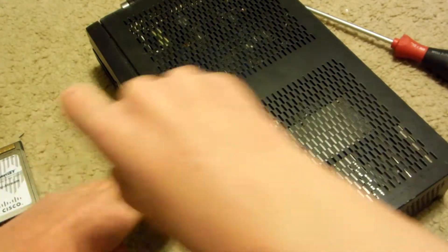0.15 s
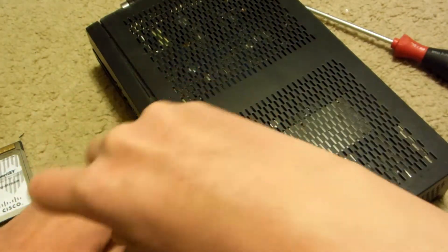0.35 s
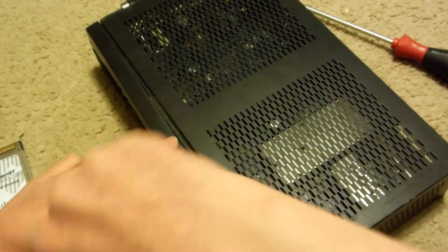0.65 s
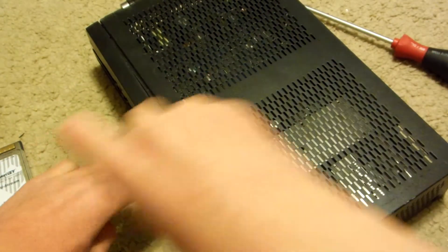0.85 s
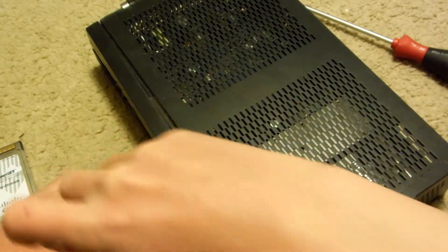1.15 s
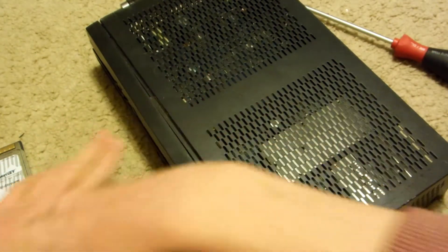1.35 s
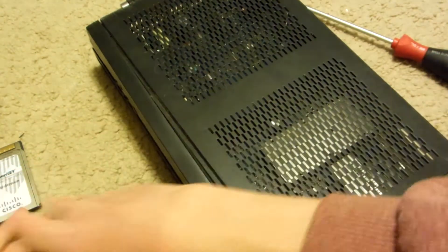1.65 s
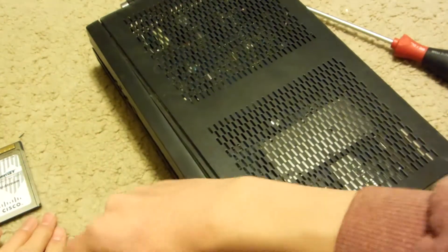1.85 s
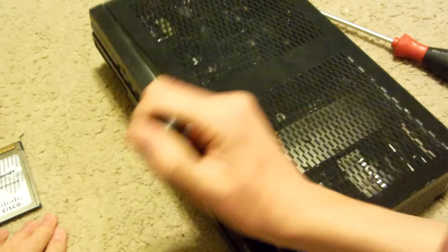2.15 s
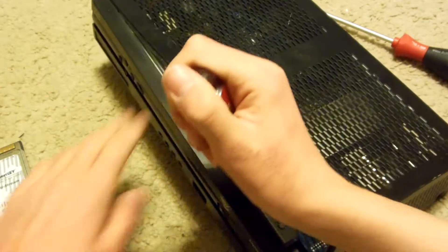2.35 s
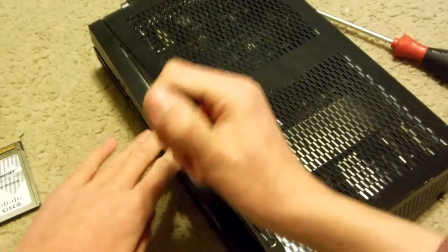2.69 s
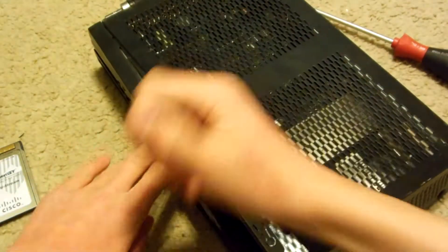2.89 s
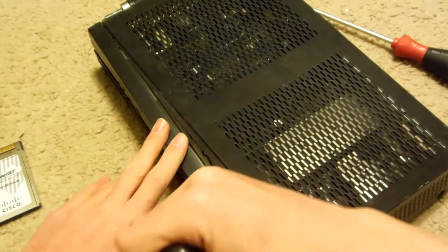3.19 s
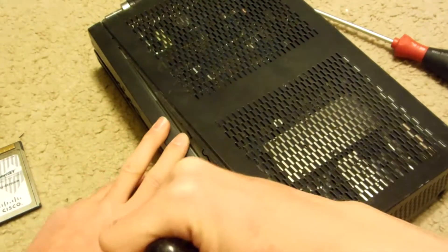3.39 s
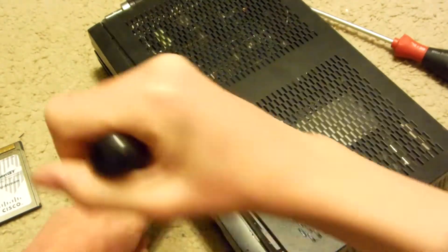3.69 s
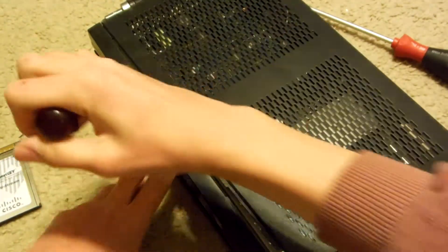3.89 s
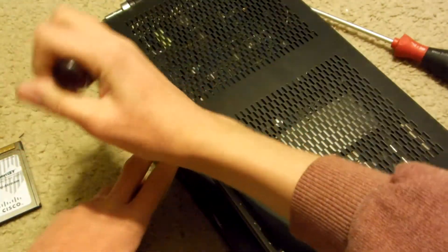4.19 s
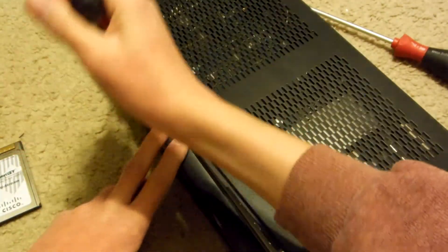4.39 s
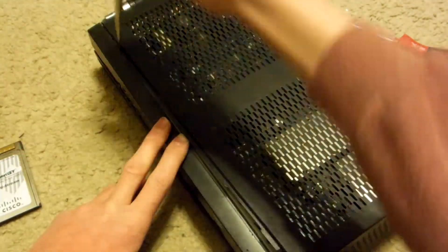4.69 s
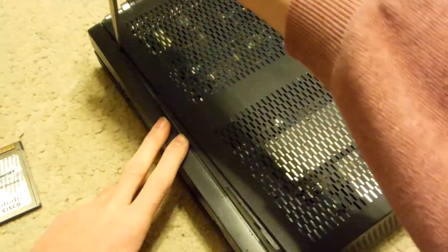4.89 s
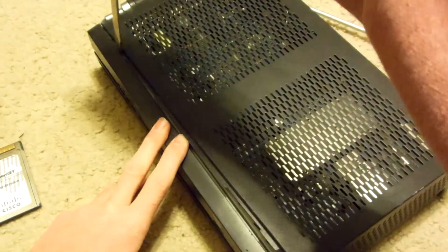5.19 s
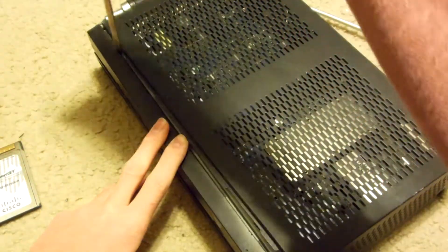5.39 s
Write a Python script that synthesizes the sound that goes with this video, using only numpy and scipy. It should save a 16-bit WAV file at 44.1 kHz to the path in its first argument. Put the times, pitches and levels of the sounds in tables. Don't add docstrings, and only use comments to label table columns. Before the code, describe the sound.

Indoors and close up, a blade knocks and drags on a sheet-metal casing, with tinny clatter, brief groans and a hard closing knock.

```python
import sys
import numpy as np
from scipy import signal
from scipy.fft import rfft, irfft, next_fast_len
from scipy.io import wavfile
from scipy.ndimage import uniform_filter1d

SR = 44100
rng = np.random.default_rng(int(sys.argv[2]) if len(sys.argv) > 2 else 0)


def to_wav(sig):
    pcm = np.clip(np.atleast_2d(sig), -1, 1) * 32767
    pcm = np.round(pcm).astype(np.int16)
    wavfile.write(sys.argv[1], SR, pcm.T)


def voltage_ratio(decibels):
    exponent = np.asarray(decibels, float) / 20
    return 10 ** exponent


N = 244358

# (frequency [Hz], density [dB/Hz])
FLOOR_SPECTRUM = [(12, -40.5), (20, -6.5), (70, -11), (87, -15.5), (224, -19.5), (265, -25), (304, -21),
                  (576, -28.5), (1570, -40.5), (1850, -35), (3310, -40.5), (13300, -48), (15300, -59.5)]
FLOOR_LEVEL_DB = -57
# (frequency [Hz], side minus mid [dB])
FLOOR_WIDTH = [(60, -12), (110, -3.5), (200, -3.5), (380, -8), (690, -3), (1280, 1.5), (2360, -3.5),
               (4360, 0.5), (8040, -1), (14800, 3.5)]
# (frequency [Hz], level [dB])
WHINE = [(13194, -83.5)]
# (time [s], level [dB])
WHIR = [(0.0, -62), (0.272, -64), (0.31, -73.5), (0.6, -65), (0.78, -90), (1.012, -76), (1.272, -60),
        (1.459, -83)]
WHIR_HZ, WHIR_TOP_DB = 1260, -58
# (time [s], level [dB])
RUSTLE = [(0.0, -60), (0.09, -66), (0.25, -74), (1.29, -70.5), (1.53, -60), (2.05, -50), (2.33, -63.5),
          (2.76, -63.5), (2.99, -60), (3.55, -60), (3.75, -69), (4.41, -70), (5.01, -71), (5.54, -64.5)]
RUSTLE_TOP_DB, RUSTLE_SHELF_DB = -60, -12
# (time [s], level [dB], frequency [Hz])
THUMPS = [(0.52, -41, 159.5), (1.47, -46, 144), (1.635, -43.5, 181), (1.753, -41, 183), (2.055, -43, 173),
          (2.7, -44, 165), (2.898, -43, 153), (3.039, -44, 213), (3.348, -46, 178.6), (3.492, -32, 179),
          (3.991, -45.5, 154.2), (4.738, -55, 153), (5.189, -48, 154), (5.511, -37.5, 232)]
THUMP_T60_S, THUMP_RISE_S = 0.081, 0.0071
# (time [s], level [dB], frequency [Hz], t60 [s])
GROANS = [(.525, -28, 1000, 0.085), (1.468, -25.5, 1950, .08), (1.69, -22, 1250, .08),
          (1.755, -35, 488, 0.08), (2.705, -28, 1600, .07), (2.71, -38, 645, .12), (2.895, -51, 670, .15),
          (3.008, -40, 450, 0.25), (3.055, -40, 670, 0.38), (3.06, -41, 1120, .15), (3.2, -38, 660, 0.2),
          (3.21, -35.5, 1050, .12), (3.26, -41, 365, 0.15), (3.35, -31.5, 540, .15),
          (3.369, -32, 980, 0.31), (3.39, -39, 370, .35), (3.524, -28.5, 1000, .12),
          (3.5, -35.5, 341.3, 0.22), (3.994, -33.5, 4770, 0.058), (4.08, -47.5, 1150, 0.33),
          (4.355, -59, 1074, 0.27), (4.56, -49.5, 370, 0.14), (5.205, -50, 370, 0.18),
          (5.514, -28, 711, .08), (5.516, -32, 400, .1)]
GROAN_RISE_S, GROAN_SPREAD = 0.006, 0.03
# (start [s], level [dB])
RING_STARTS = [
    (0.519, -46),
    (0.659, -53),
    (1.74, -31.5),
    (3.5, -31),
    (4.741, -47),
]
# (frequency [Hz], level [dB], t60 [s])
RING_MODES = [
    [(4172, 0, .3), (1055, -3, .25), (2630, -6, .25)],
    [(1750, 2, .45), (3100, 5, .3), (4280, -1, .55), (2600, -10, .3)],
    [(1087, -6, .4), (1674, -3, .25), (2702, -4, .42), (3828, -7, .4), (3898, -4, .37), (4172, -3, .46),
     (5739, -6, .3), (6955, -6, .35), (7111, -5, .27)],
    [(400, -13, .7), (1136, -8, .32), (1798, -10, .72), (2207, -12, .6), (2595, -8, .27), (3106, -5, .52),
     (3580, -10, .55), (4113, -5, .34), (4177, -1, .33), (4269, -7, .55), (4544, -4, .25), (5351, -7, .31),
     (5857, -3, .24), (6406, -8, .31)],
    [(1090, -4, .4), (1820, 0, .3), (2360, -5, .26)],
]
LONGEST_S = 0.8
# (frequency [Hz], level [dB], t60 [s])
HOLLOW_MODES = [(365, -9, .2), (430, -7, .15), (560, -8, .1), (670, -4, .12), (1000, -2, .12),
                (1130, -3, .1), (1280, -5, .08), (1800, -6, .1), (3100, -3, .1), (4180, 0, .12),
                (4540, -3, .08), (5770, -2, .07), (6970, -3, .08)]
# (frequency [Hz], density [dB/Hz])
SHEET_SPECTRUM = [(150, -30), (300, -10), (600, -1), (1100, 2), (2200, -1), (4200, 1), (7000, 0),
                  (11000, -1), (14500, 1)]
# (frequency [Hz], t60 [s])
SHEET_T60 = [(300, 0.22), (1000, 0.025), (3000, 0.14), (7000, 0.14), (14000, 0.15)]
# (frequency [Hz], t60 [s]); level re clatter
GLOW_T60 = [(300, 0.43), (2000, 0.34), (6000, 0.26), (14000, 0.26)]
GLOW_DB = -4
# (frequency [Hz], side minus mid [dB])
WIDTH = [(60, -10), (110, -4), (200, -2), (380, -17), (690, -28.5), (1280, -22.5), (2360, -15), (4360, -10),
         (8040, -5.5), (14800, -2.5)]
# (low [Hz], high [Hz])
BANDS_HZ = [(310, 1200), (1200, 3500), (3500, 7500), (7500, 18000)]
ANSWER_SAMPLES = 11500
# (start [s], length [s], pressure at 1.2-3.5 kHz [dB], sag by the end [dB], thud re pressure [dB])
STROKES = [(0.0, 0.073, -52.5, 39, 3.5), (0.669, 0.064, -52.5, 14, 4), (1.443, 0.028, -57, -28, 5),
           (1.63, .19, -27, 16.5, -10.5), (2.036, 0.074, -43.5, 30, 3.5), (2.878, 0.124, -45.5, 1.5, -0.5),
           (3.002, 0.098, -46, 3, 7), (3.174, 0.14, -32.5, 23.5, 1.5), (3.335, .135, -34, 28.5, 6),
           (3.48, 0.082, -20, 16.5, -9), (4.05, 0.11, -56, 9, 6)]
BITE_SHARE, BITE_DB, SAG_POWER = 0.17, -13.5, 1.68
CLUMP_DB, CLUMP_S = 2.5, 0.0052
DRAG_HARD_DB, HARD_PER_DB, DRAG_EDGE_DB, DRAG_EDGE_PER_DB = -1.56, 0.3, 0.7, 0.94
# (time [s], blow at 1.2-3.5 kHz [dB], thud re blow [dB],
# hardness [dB], chatter t60 [s])
TAPS = [(0.0687, -45.5, 3.5, -18, 0.023), (0.2448, -40.5, 1, -19, 0.01), (0.5182, -21.5, -5, -8, 0.07),
        (0.6649, -36.5, -16, -4, 0.046), (0.8833, -58, 13.5, -17, 0.027),
        (0.9433, -43.5, 6.5, -14.5, 0.046), (1.4687, -20.5, -22, -5, 0.07), (1.7318, -14, -22, 2, 0.03),
        (1.972, -41.5, 7.5, 4.5, 0.038), (2.029, -42.5, -4, 2, 0.01), (2.1776, -56.5, 4.5, 5.5, 0.027),
        (2.3104, -45, 5.5, -12, 0.09), (2.4786, -45.5, -6, -6, 0.033), (2.578, -52.5, 4, 4.5, 0.039),
        (2.7042, -20.5, -3.5, -16.5, 0.018)]
# (time [s], blow [dB], thud re blow [dB], hardness [dB],
# chatter t60 [s])
LATER_TAPS = [(3.494, -22, -22, 14, 0.075), (3.9919, -24, -5.5, -0.5, 0.014), (4.355, -54.5, 0.5, -4.5, 0.018),
              (4.4729, -57, -1.5, -8, 0.022), (4.5577, -49.5, 5.5, -3, 0.032), (4.6253, -53, 6, -8, 0.039),
              (4.7399, -34.5, -1.5, -13, 0.046), (5.1799, -37.5, 1.5, -4.5, 0.056),
              (5.4115, -48.5, -3.5, 19, 0.044), (5.479, -66, 9, 31, 0.0075), (5.514, -3.5, -7.5, -2, 0.0075)]
# (time [s], blow [dB], thud re blow [dB],
# hardness [dB], chatter t60 [s])
EXTRA_TAPS = [(0.203, -55.5, 11, -1, 0.0098), (0.525, -31, 6.5, 2, 0.02), (1.457, -26.5, -27, -9, 0.0098),
              (1.629, -16, -9.5, 1, 0.056), (1.786, -29.5, 2, 8.5, 0.035), (2.089, -40.5, -3, 1, 0.0035),
              (2.114, -59, -2, 7, .005), (2.325, -55, -12, 8, 0.068), (2.666, -52, 0, 4, 0.022),
              (3.264, -22.5, -14, -5, 0.023), (4.727, -59, -6, 4.5, 0.018), (4.952, -64.5, 2, 0, 0.0029),
              (5.158, -44.5, -0.5, -7, 0.018), (5.391, -57, 5, 10, .02), (5.505, -39, -30, 5, .01)]
TAP_EDGE_DB, TAP_EDGE_PER_DB = 6.0, 1.17


def evened(x):
    return x / np.sqrt(np.mean(x ** 2) + 1e-20)


def read(points, hz):
    f, value = np.transpose(points)
    return np.interp(np.log(hz + 1), np.log(f + 1), value)


def add(mix, s, sound):
    part = mix[:, round(s * SR):][:, :sound.shape[1]]
    part += sound[:, :part.shape[1]]


def shaped_noise(db, size, count):
    real, imag = rng.standard_normal((db.shape[2], db.shape[1], 2, 2)).T
    spectrum = (real + 1j * imag) * voltage_ratio(db)
    return signal.istft(spectrum, nperseg=size, noverlap=size * 3 // 4)[1][:, :count]


def room():
    hz, frames = np.fft.rfftfreq(2048, 1 / SR)[:, None], N // 512 + 5
    patches = uniform_filter1d(rng.standard_normal((frames, len(hz))), 6, 0)
    patches = evened(uniform_filter1d(patches, 20, 1)).T
    mid_db = read(FLOOR_SPECTRUM, hz) + 0.31 * patches
    air = shaped_noise(np.array([mid_db, mid_db + read(FLOOR_WIDTH, hz)]), size=2048, count=N)
    air = voltage_ratio(FLOOR_LEVEL_DB) * air / np.std(air[0])
    t = np.arange(N) / SR
    whine = sum(voltage_ratio(db + 4.5) * np.sin(2 * np.pi * f * t) for f, db in WHINE)
    return air + whine * np.array([[1], [.3]])


def whir():
    s, db = np.transpose(WHIR)
    t = np.arange(s[0], s[-1], 1 / SR)
    pole = np.exp(-np.pi * 50. / SR)
    slow = signal.lfilter([1], [1, -pole], rng.standard_normal((2, len(t))))
    turns = 2 * np.pi * WHIR_HZ * t
    tone = evened(slow[0] * np.cos(turns) + slow[1] * np.sin(turns))
    tone = tone * voltage_ratio(np.interp(t, s, np.minimum(db, WHIR_TOP_DB)))
    return s[0], tone * np.array([[1], [.3]])


def rustle():
    hz, t = np.fft.rfftfreq(256, 1 / SR)[:, None], np.arange(N // 64 + 5) * 64 / SR
    s, db = np.transpose(RUSTLE)
    flicker = evened(uniform_filter1d(rng.standard_normal(len(t)), 12))
    hump_db = -9. * np.log2((hz + 20) / 1100.) ** 2
    colour_db = np.maximum(hump_db, np.where(hz > 1000, RUSTLE_SHELF_DB, -90))
    motion_db = np.interp(t, s, np.minimum(db, RUSTLE_TOP_DB)) + 2.2 * flicker
    mid_db = colour_db + motion_db
    unit = np.sqrt(16 * 4.3)
    noise = shaped_noise(np.array([mid_db, mid_db + read(WIDTH, hz)]), size=256, count=N)
    return voltage_ratio(8.0) * noise / unit


def thump(row):
    s, db, hz = row
    t = np.arange(9000) / SR
    envelope = (1 - np.exp(-t / THUMP_RISE_S)) * voltage_ratio(db + 9.0 - 60 * t / THUMP_T60_S)
    return s, envelope * np.sin(2 * np.pi * hz * t) * np.array([[1], [.1]])


def groan(row):
    s, db, hz, t60 = row
    t = np.arange(12000) / SR
    detune, phase = rng.uniform(-1, 1, (2, 2, 1))
    near = np.sin(2 * np.pi * (hz * (1 + GROAN_SPREAD * detune) * t + phase)).sum(0)
    trio = np.sin(2 * np.pi * hz * t) + .6 * near
    swell = (1 - np.exp(-t / GROAN_RISE_S)) * voltage_ratio(db - 60 * t / np.clip(t60, .03, .5))
    return s, swell * trio * np.array([[1], [.08]])


def decaying_modes(modes, count):
    hz, db, t60 = np.transpose(modes)[:, :, None]
    t = np.arange(count) / SR
    decay = voltage_ratio(db - 60 * t / np.clip(t60, .03, LONGEST_S))
    return decay * np.sin(2 * np.pi * hz * t), voltage_ratio(read(WIDTH, hz[:, 0]))


def ring(start, modes):
    s, db = start
    near = []
    for hz, level_db, t60 in modes:
        for detune in rng.uniform(-1, 1, 6):
            near.append((hz * (1 + .05 * detune), level_db - 8, t60 * .7))
    tones, side = decaying_modes(list(modes) + near, count=22000)
    mid_sign, side_sign = rng.choice([-1, 1], (2, len(side)))
    pair = np.array([mid_sign @ tones, side * side_sign @ tones])
    return s, voltage_ratio(db) * pair * (1 - np.exp(-np.arange(22000) / SR / .015))


def split(x):
    bands = [signal.sosfilt(signal.butter(2, hz, "band", fs=SR, output="sos"), x) for hz in BANDS_HZ]
    return np.array([(-1) ** k * b / np.linalg.norm(b[0]) for k, b in enumerate(bands)])


def cover(hollow, hollow_db):
    spread_db, comb_db, crack_db, crack_s = 3., 1.5, 7., .003
    hz = np.fft.rfftfreq(256, 1 / SR)[:, None]
    t = np.arange(ANSWER_SAMPLES // 64 + 5) * 64 / SR
    fast, slow = (voltage_ratio(-60 * t / np.clip(read(t60, hz), .03, .5)) for t60 in (SHEET_T60, GLOW_T60))
    decay_db = 20 * np.log10(fast + voltage_ratio(GLOW_DB) * slow)
    mid_db = read(SHEET_SPECTRUM, hz) + comb_db * rng.standard_normal(hz.shape) + decay_db
    levels_db = np.array([mid_db, mid_db + read(WIDTH, hz)])
    clatter = shaped_noise(levels_db, size=256, count=ANSWER_SAMPLES)
    clatter = clatter * voltage_ratio(crack_db * np.exp(-np.arange(ANSWER_SAMPLES) / SR / crack_s))
    modes, side = hollow
    luck = rng.standard_normal((len(modes), 2))
    weight = voltage_ratio(spread_db * luck[:, 0])
    tones = np.array([weight, weight * side * luck[:, 1]]) @ modes
    tones = voltage_ratio(hollow_db) * tones / np.linalg.norm(tones[0])
    return split(clatter / np.linalg.norm(clatter[0]) + tones)


def chatter(count, per_s, spread_db):
    luck = rng.random((count, 3))
    size = voltage_ratio(-spread_db * np.log(luck[:, 1] + 0.0035)) * np.sign(luck[:, 2] - .5)
    return size * (luck[:, 0] < per_s / SR)


def stroke(row, hollow, places=3):
    s, length, db, sag_db, thud_db = row
    u = np.arange(round(length * SR)) / (length * SR)
    pressure_db = db + BITE_DB * np.clip(1 - u / BITE_SHARE, 0, 1) - sag_db * u ** SAG_POWER
    force = evened(chatter(count=len(u), per_s=4200.0, spread_db=2.5))
    force = force * signal.windows.tukey(len(u), .08)
    clumps = evened(uniform_filter1d(rng.standard_normal(len(u)), round(CLUMP_S * SR)))
    force = force * voltage_ratio(CLUMP_DB * clumps)
    hard_db = DRAG_HARD_DB + HARD_PER_DB * (db + 38)
    bands_db = np.array([thud_db, 0, hard_db, DRAG_EDGE_DB + DRAG_EDGE_PER_DB * hard_db])
    grains = voltage_ratio(pressure_db + bands_db[:, None]) * force
    place = rng.integers(0, places, len(u))
    size = next_fast_len(len(u) + ANSWER_SAMPLES)
    total = 0
    for k in range(places):
        answer = rfft(cover(hollow, hollow_db=-10.5), size)
        total = total + np.sum(rfft(grains * (place == k), size)[:, None] * answer, 0)
    return s, irfft(total, size)


def tap(row, hollow):
    s, db, thud_db, hard_db, t60 = row
    t = np.arange(6000) / SR
    force = evened(chatter(count=len(t), per_s=5000., spread_db=-1.5))
    force[0] = 0.65
    force = force * voltage_ratio(-60 * t / np.clip(t60, .003, .4))
    force = force / np.linalg.norm(force)
    bands_db = np.array([thud_db, 0, hard_db, TAP_EDGE_DB + TAP_EDGE_PER_DB * hard_db])
    answer = np.tensordot(voltage_ratio(db + bands_db), cover(hollow, hollow_db=-14.5), 1)
    return s, voltage_ratio(16.0) * signal.fftconvolve(force[None], answer, axes=1)


def scene():
    mix = room() + rustle()
    add(mix, *whir())
    for row in THUMPS:
        add(mix, *thump(row))
    for row in GROANS:
        add(mix, *groan(row))
    for start, modes in zip(RING_STARTS, RING_MODES):
        add(mix, *ring(start, modes))
    hollow = decaying_modes(HOLLOW_MODES, count=ANSWER_SAMPLES)
    for row in STROKES:
        add(mix, *stroke(row, hollow))
    for table in (TAPS, LATER_TAPS, EXTRA_TAPS):
        for row in table:
            add(mix, *tap(row, hollow))
    return np.array([mix[0] + mix[1], mix[0] - mix[1]])


def top_cut(x):
    return signal.sosfilt(signal.butter(12, 15420, fs=SR, output="sos"), x)


def record(dry):
    low_pass = signal.firwin(801, 14230, window=("kaiser", 8), fs=SR)
    limited = signal.oaconvolve(np.clip(dry, -1, 1), low_pass[None], "same")
    return top_cut(np.clip(limited, -1, 1))


dry = scene()
out = record(dry)
to_wav(out)
```